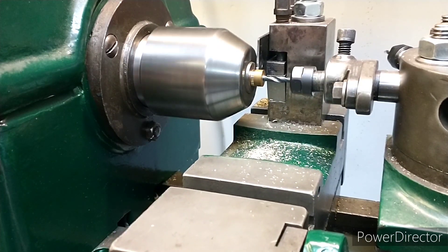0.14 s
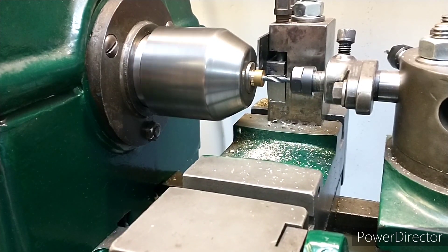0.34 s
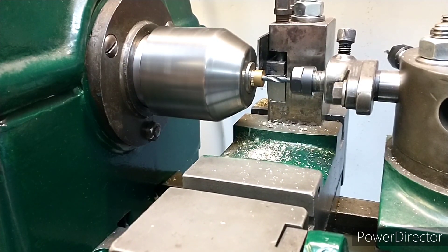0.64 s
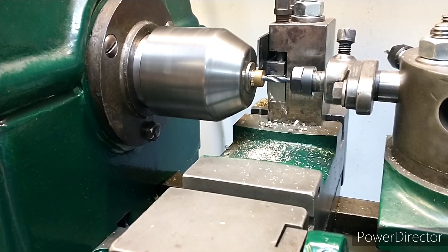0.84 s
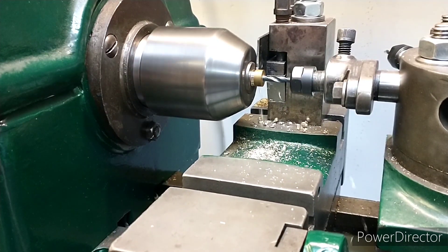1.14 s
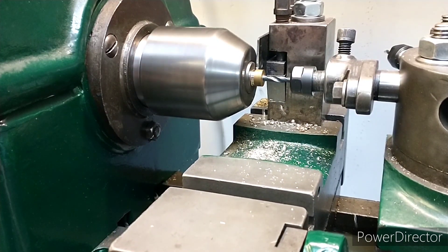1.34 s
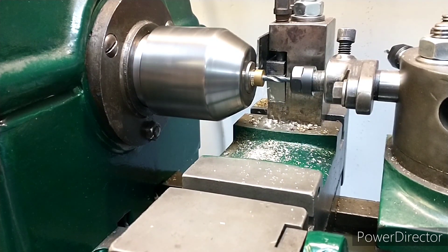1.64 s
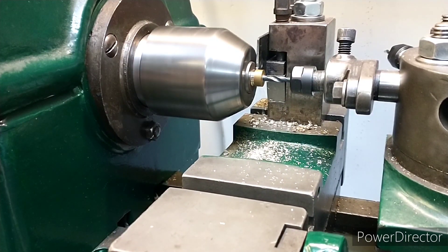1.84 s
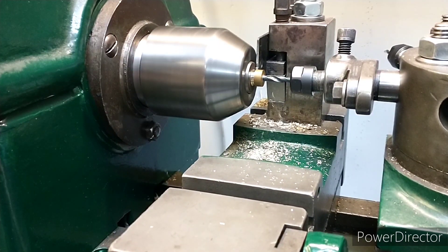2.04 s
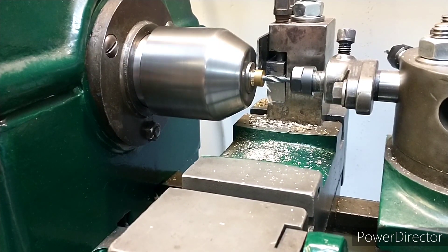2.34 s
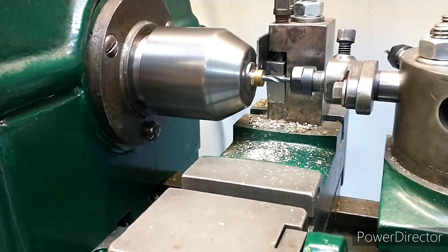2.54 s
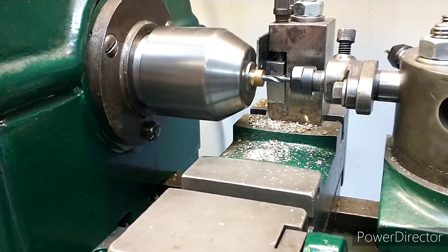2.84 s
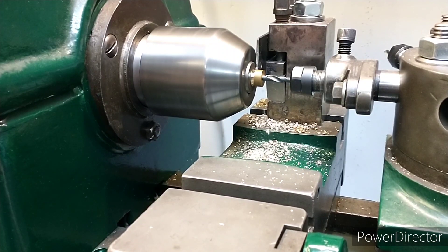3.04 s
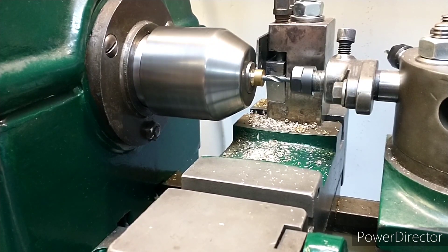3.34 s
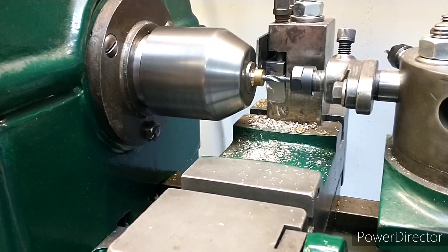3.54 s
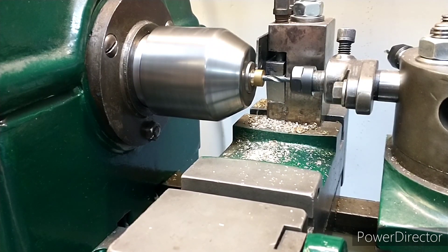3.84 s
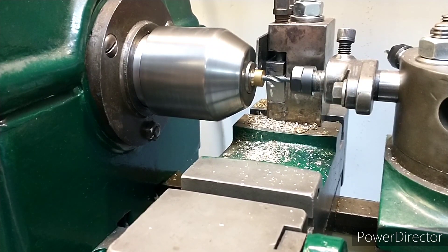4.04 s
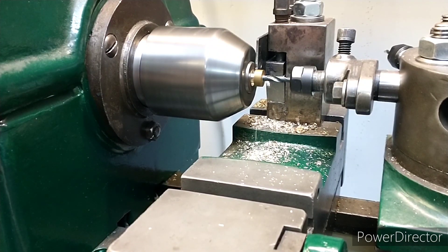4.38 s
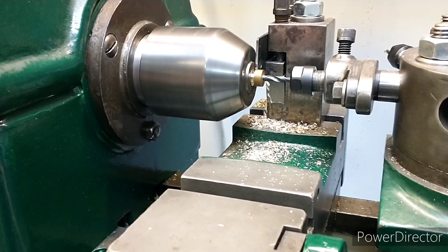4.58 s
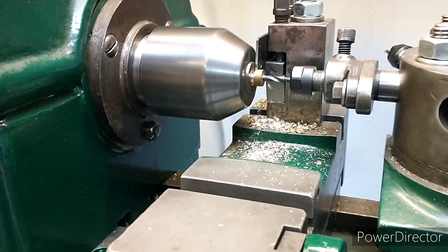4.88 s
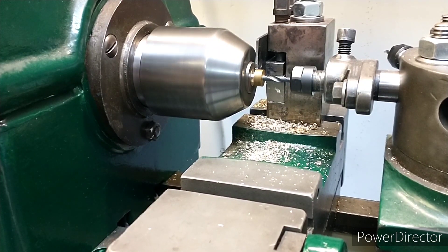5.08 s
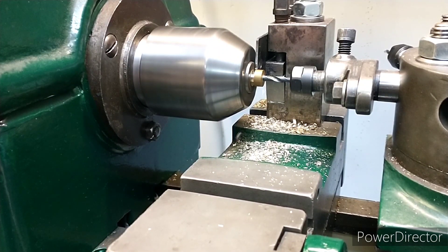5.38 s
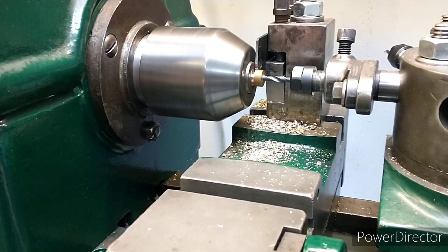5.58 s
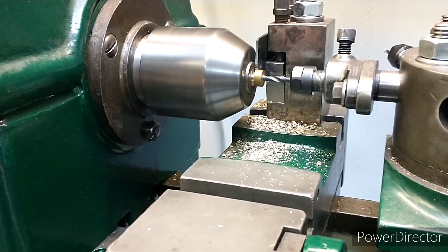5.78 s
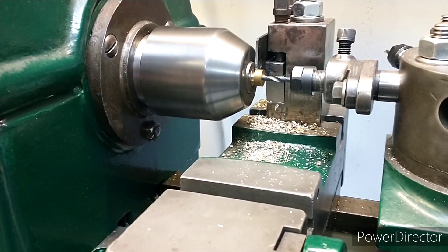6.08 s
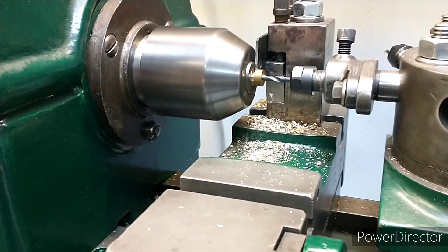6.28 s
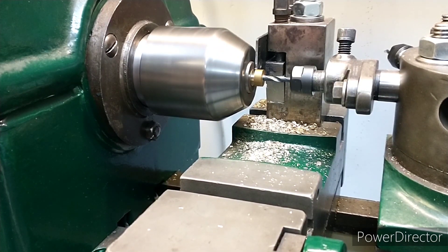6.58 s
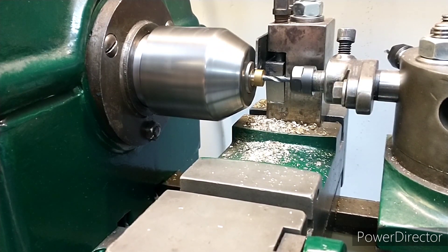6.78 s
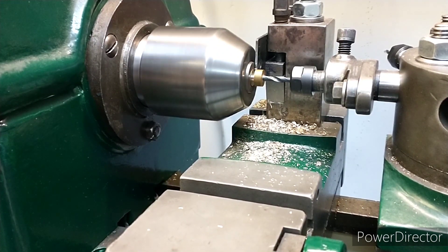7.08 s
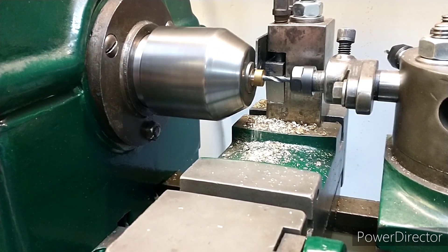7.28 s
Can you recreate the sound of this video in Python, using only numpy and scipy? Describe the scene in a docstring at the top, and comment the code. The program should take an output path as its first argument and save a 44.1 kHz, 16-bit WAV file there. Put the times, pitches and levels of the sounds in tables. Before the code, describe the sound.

A lathe tool cuts spinning brass with a pulsing metallic screech that sinks in pitch, over hissing chips and a steady motor hum.

```python
"""A lathe tool cutting spinning brass: it grazes the stock, digs in, then screeches in even pulses.
The chip shears off in thousands of slips a second; each bite thickens it, so the pitch dips and the
level swells. Crumbling chip hisses; tip and holder ring. Below, the motor hums, the drive ticks once
a turn and the slide knocks at the start. Machine faces and the workshop scatter the sound."""
import sys
import numpy as np
from scipy import signal
from scipy.fft import rfft, irfft
from scipy.io import wavfile
from scipy.ndimage import uniform_filter1d

SR = 44100
rng = np.random.default_rng(int(sys.argv[2]) if len(sys.argv) > 2 else 0)


def store_pcm(level_fs):
    """Save levels as 16-bit WAV."""
    pcm = np.round(np.clip(level_fs, -1, 1) * 32767).astype(np.int16)
    wavfile.write(sys.argv[1], SR, np.atleast_2d(pcm).T)


N = 327222
TIME = np.arange(N) / SR
FREQ = np.maximum(np.arange(N // 2 + 1) * SR / N, 1)

# how well the machine radiates the cut: f/Hz, gain/dB
RADIATION = [(100, -40), (600, -16), (1500, -9), (2000, -0.5), (2280, -3.5), (2450, -0.5), (3050, -4),
             (3330, -9.5), (3900, -5.5), (5000, -2.5), (6000, 2), (7000, -2), (9000, 3.5), (12300, -1.5),
             (13600, -5.5), (15000, -11.5)]


def amp(db):
    """dB to gain."""
    return 10 ** (np.asarray(db) / 20)


def unit(x):
    """Scale to rms 1."""
    return x / np.sqrt(np.mean(x ** 2))


def pan(db):
    """Stereo gains for a left-minus-right level."""
    return amp(np.array([[db], [-db]]) / 2)


def colour(x, points):
    """Filter by (f/Hz, gain/dB) points."""
    hz, db = np.transpose(points)
    return irfft(rfft(x) * amp(np.interp(np.log(FREQ), np.log(hz), db)), N)


def tint(x, points):
    """Colour, then scale to rms 1."""
    return unit(colour(x, points))


def walk(rate_hz):
    """Smooth random wander, rms 1."""
    return unit(irfft(rfft(rng.standard_normal(N)) / (1 + (FREQ / rate_hz) ** 4), N))


def swell(at_s, length_s):
    """Rounded force pulse, peak 1."""
    away = np.minimum(np.abs(2 * (TIME - at_s) / length_s), 10)
    return np.exp(-away * away * away / 2)


def blow(age_s, decay_s):
    """Sudden push that dies away, peak 1."""
    age = np.maximum(age_s, 0) / decay_s
    return np.sqrt(2 * np.e * age) * np.exp(-age)


def resonate(x, modes):
    """Ring (f/Hz, width/Hz, gain/dB) resonances."""
    response = sum(amp(db) / (1 + 2j * (FREQ - hz) / width) for hz, width, db in modes)
    return irfft(rfft(x) * response, N)


def follow(x, hz, low, high, leak_db, size=256):
    """Constant-power moving band, low * hz to high * hz: steep below, gentle above."""
    f, t, frames = signal.stft(x, SR, nperseg=size)
    ratio = f[:, None] / np.interp(t, TIME, hz)
    highpass = 1 / np.hypot(1, (low / (ratio + 1e-3)) ** 8) + amp(leak_db)
    gain = highpass / np.hypot(1, (ratio / high) ** 2)
    gain /= np.sqrt(np.mean(gain ** 2, axis=0))
    return signal.istft(frames * gain, SR, nperseg=size)[1][:N]


def scatter(x, t60_s, size):
    """Dense decaying reflections, different at each ear."""
    tail = rng.standard_normal((2, size)) * np.exp(-np.log(1000) * TIME[:size] / t60_s)
    tail /= np.sqrt(np.sum(tail ** 2, axis=1, keepdims=True))
    return signal.fftconvolve(x[None], tail, axes=1)[:, :N]


def smear(x, spread_s, bands=200):
    """Machine reflections delay each band by its own time; left paths are longer."""
    knots_hz = np.linspace(0, SR / 2, bands)
    paths_s = rng.exponential(spread_s, (2, bands)) * np.array([[2], [1]])
    delay_s = np.array([np.interp(FREQ, knots_hz, row) for row in paths_s])
    return irfft(rfft(x) * np.exp(-2j * np.pi * np.cumsum(delay_s, axis=1) * SR / N), N)


def motor(rumble_db=-46.5, waver_db=-0.1):
    """Mains hum in the castings over bearing and belt rumble."""
    # motor and drive lines: f/Hz, level/dB, left minus right/dB, left lead/rad
    hum_lines = [(100.27, -41, .3, 0), (176, -58, 1, 0), (200.55, -52.5, 1, 0), (225, -62, 1, 0),
                 (300.82, -45.5, 3, .55), (401.1, -52.5, 3, .5)]
    # bearings and belt: f/Hz, level/dB
    spectrum = [(20, -14), (55, -15), (80, -2.5), (135, -5), (180, -3), (265, 2), (330, -2.5), (430, -3.5),
                (500, -7.5), (800, -7), (1800, -13), (3000, -16), (4200, -26.5), (15000, -20.5)]
    hum = 0
    for hz, db, side_db, lead in hum_lines:
        phase = 2 * np.pi * hz * TIME + rng.uniform(0, 2 * np.pi) + 0.1 * walk(2.2)
        peak = np.sqrt(2) * amp(db + waver_db * walk(7.2))
        hum = hum + peak * pan(side_db) * np.sin(phase + np.array([[lead], [0]]))
    mid = tint(rng.standard_normal(N), spectrum)
    side = tint(rng.standard_normal(N), spectrum)
    side = colour(side, [(100, -7.5), (350, -6.0), (600, -7.5), (1000, 1.0)])
    return hum + amp(rumble_db) * (mid + side * np.array([[1], [-1]])) * pan(0.41)


def drive(spindle_hz=14.988, first_s=0.0494, decay_s=0.0054, gain_db=-48, after_s=0.011, after_db=-6):
    """One tick per spindle turn, a weaker one just after."""
    def tick(at_s):
        return blow((TIME - at_s) % (1 / spindle_hz), decay_s)
    ticks = tick(first_s) + amp(after_db) * tick(first_s + after_s)
    force = uniform_filter1d(ticks, size=130) * amp(walk(8.2))
    # drive tick: f/Hz, level/dB
    spectrum = [(300, -39), (600, 0.5), (900, -2), (1200, 8), (1450, -4), (1750, 12.5), (2150, 0),
                (2900, 3.5), (3600, -49), (8000, -34)]
    return tint(rng.standard_normal(N), spectrum) * force * amp(gain_db)


def slide(decay_s=0.0058, rattle_db=3.0):
    """The slide rattles briefly as it is fed up to the work."""
    # slide knocks: t/s, level/dB
    knocks = [(0.019, -41.5), (.086, -38), (.154, -41), (.22, -39.5), (0.285, -35.5)]
    # one knock: f/Hz, level/dB
    spectrum = [(200, -18), (450, -8), (620, 12), (850, 2), (1080, 9.5), (1350, -3.5), (1750, -1),
                (2200, -5), (3000, -4.5), (5000, -24)]
    force = sum(amp(db) * blow(TIME - at_s, decay_s) for at_s, db in knocks)
    rattle = rng.standard_normal(N) * amp(rattle_db * walk(320))
    return tint(rattle, spectrum) * force


def grazes(first_s=0.066, every_s=0.0708, length_s=0.016, first_db=-49.5, step_db=7.5, top_db=-22.5):
    """The tip brushes the stock's high spot about once a turn, then rubs lightly all round."""
    # tip rubbing on brass: f/Hz, level/dB
    spectrum = [(500, -9), (3000, -27), (5500, -17), (7000, -4), (9000, 4.5), (11500, 4), (13600, -10),
                (15500, -3.5)]
    turns = np.arange(7)
    levels_db = np.minimum(first_db + step_db * turns, top_db)
    brushes = sum(amp(db) * swell(s, length_s) for s, db in zip(first_s + every_s * turns, levels_db))
    rubbing = amp(-43) * np.interp(TIME, [0, .2, .45, .9, 1.2], [0.83, 0.0, 1.0, 0.52, 0.053])
    return tint(rng.standard_normal(N), spectrum) * (brushes + rubbing)


def tip(rub):
    """Rubbing keeps the tool tip ringing thinly."""
    # tip resonances: f/Hz, width/Hz, gain/dB
    modes = [(11335, 90, 2), (11540, 50, -2)]
    return resonate(rub, modes) * amp(-1) * pan(2.5)


def shudder(force, slip_hz, gain_db=-25):
    """The heaviest chips shake the tool holder."""
    # holder shake: f/Hz, level/dB
    spectrum = [(300, -45), (600, -15), (780, -2), (1000, -4), (1200, -3.5), (1600, -15), (3000, -12.5)]
    return tint(rng.standard_normal(N), spectrum) * force * (2500 / slip_hz) ** 2 * amp(gain_db)


def holder(force, slip_hz, gain_db=-20, thick_hz=4200):
    """Thick chips jolt the holder, which rings hollowly."""
    # holder resonances: f/Hz, width/Hz, gain/dB
    modes = [(2550, 130, 1.5), (2953, 52, 1), (4205, 66, -3)]
    jolts = rng.standard_normal(N) * amp(1.9 * walk(300))
    weight = np.minimum(thick_hz / slip_hz, 1) ** 4
    return unit(resonate(jolts, modes)) * force * weight * amp(gain_db)


def ring(x):
    """Metal resonances radiate unevenly to each side; rms gain 1."""
    # tool, holder and chuck: f/Hz, width/Hz, left/dB, right/dB
    modes = [(2460, 97, 7, 10), (2976, 87, 11, 14.5), (3280, 44, 0, 6), (3500, 127, 10.5, 12.5),
             (3693, 140, 11.5, 12), (4119, 170, 14.5, 16), (4460, 155, 6.5, 5), (4660, 65, 15, 10),
             (4907, 107, 9, 4.5), (5260, 130, 9, 6.5), (5780, 260, 1.5, 0), (6280, 67, 4.5, -3),
             (6680, 130, 15.5, 15), (7000, 91, -6.5, 12), (7278, 210, 17, 1.5), (7670, 308, 0, 8.5),
             (8604, 78, 9.5, 9), (8900, 304, 9, 0), (9870, 410, 2.5, 2.5), (11030, 118, 7.5, 7),
             (11320, 152, 12.5, 11.5), (11430, 140, 11.5, 1), (12600, 106, 7, 1), (13030, 520, 9.5, 6),
             (14376, 546, 9.5, 13), (14860, 273, 12.5, 13.5)]
    gain = amp(sum(np.array([[left], [right]]) / (1 + (2 * (FREQ - hz) / width) ** 2)
                   for hz, width, left, right in modes))
    return irfft(rfft(x) * gain / np.sqrt(np.mean(gain ** 2)), N)


def feed_db(t, entry_db_per_s=78):
    """Base level of the cut: rises as the edge enters, then follows feed pressure."""
    # thin cut under the feed: t/s, level/dB
    pressure = [(0.85, -41), (0.97, -26), (1.5, -24), (2.2, -20), (2.65, -22), (3.1, -21), (3.95, -20.5),
                (4.35, -24), (4.7, -22.5), (5.45, -27.5), (6.1, -26), (7.42, -32)]
    at_s, db = np.transpose(pressure)
    return np.interp(t, at_s, db) - entry_db_per_s * np.maximum(at_s[0] - t, 0)


def chip(fall_width=0.51, rise_width=0.69, bite_db=-3.0, thin_db=-10, usual_db=7.5, lead_s=.008):
    """Cutting force, slip rate, bite depth (0-1). Bites thicken the chip and slow its slips."""
    # short heavy chips: t/s, strength/dB, length/s, lowest slip rate/Hz
    bites = [(1.012, 4, .05, 8800), (1.097, 7, .05, 8240), (1.185, 8, 0.051, 7790),
             (1.277, 8.5, 0.052, 7060), (1.37, 11.5, 0.064, 5596), (1.474, 10.5, 0.052, 6140),
             (1.604, 7, 0.07, 5800), (1.723, 6.5, .059, 6000), (1.83, 8.5, 0.061, 5320),
             (1.959, 8.5, 0.062, 5110), (2.069, 8, 0.062, 4712), (2.174, 7, 0.065, 4676),
             (2.293, 8.5, .064, 4486), (2.423, 6.5, 0.067, 4110), (2.562, 7.5, .072, 4420),
             (2.701, 8, 0.074, 4266), (2.816, 6, 0.053, 5300), (2.913, 6, 0.065, 5035),
             (3.016, 1.5, 0.054, 5420), (3.1, 1, 0.074, 5784), (3.169, -2, .045, 6730),
             (3.24, 2, 0.065, 5103), (3.374, 4.5, 0.066, 3896), (3.495, 7.5, 0.063, 3750),
             (3.624, 7.5, .068, 3734), (3.688, -3, .035, 5393), (3.757, 6, .072, 3750),
             (3.9, 5, 0.071, 4000), (3.971, 3.5, 0.046, 5250), (4.041, 5.5, 0.064, 4283),
             (4.159, 6, .06, 3758), (4.296, 8, 0.06, 3960), (4.434, 6, 0.061, 4228),
             (4.561, 5.5, .06, 3652), (4.671, 3.5, 0.048, 4113), (4.761, 2, 0.052, 4094),
             (4.878, 5.5, .062, 3350), (5.019, 7.5, 0.069, 3050), (5.16, 10, 0.071, 2607),
             (5.297, 4, 0.061, 4006), (5.43, 6, 0.059, 3300), (5.575, 7, 0.061, 3100),
             (5.685, 10, 0.063, 2890), (5.83, 10.5, 0.067, 2400), (5.977, 7.5, 0.063, 2660),
             (6.097, 9, 0.065, 2298), (6.224, 7, .07, 2340), (6.381, 6.5, 0.065, 2512),
             (6.538, 8, .07, 2330), (6.685, 7, .066, 2400), (6.814, 6.5, 0.09, 2400),
             (6.984, 8, 0.07, 2227), (7.103, 8, 0.061, 2202), (7.226, 8, .07, 2203),
             (7.387, 8.5, 0.093, 1837)]
    # jolts where the edge catches: t/s, level over feed/dB
    snags = [(1.458, 2), (2.408, 3.5), (2.669, 6), (3.35, 5), (4.681, 2.5), (5.183, 8.5), (6.228, 6.5)]
    # thin-chip slip rate, sinking as the tool goes deeper: t/s, f/Hz
    thin_slip = [(1.0, 10610), (2.1, 8983), (2.7, 8470), (3.1, 6990), (3.4, 8220), (3.7, 6555), (4.0, 5700),
                 (4.25, 6796), (4.72, 5317), (5.0, 6560), (5.6, 5970), (6.0, 4870), (7.42, 3694)]
    at_s, strength_db, lengths_s, lowest_hz = np.transpose(bites)
    peaks_db = feed_db(at_s) + strength_db + bite_db
    bite_force = sum(amp(db) * swell(s, length) for s, length, db in zip(at_s, lengths_s, peaks_db))
    snag_force = sum(amp(feed_db(s) + db) * blow(TIME - s, decay_s=0.0044) for s, db in snags)
    # the chip squeals on between light bites; hard ones break it off
    break_db = 0.73 * np.interp(TIME, at_s, strength_db - usual_db)
    thin_force = amp(feed_db(TIME) + thin_db - break_db)
    force = np.sqrt(bite_force ** 2 + snag_force ** 2 + thin_force ** 2)

    thin_period_s = 1 / np.interp(TIME, *np.transpose(thin_slip))
    period_s, depth = thin_period_s.copy(), np.zeros(N)
    for s, length, hz in zip(at_s, lengths_s, lowest_hz):
        near = slice(*np.searchsorted(TIME, [s - 2 * length, s + 2 * length]))
        age_s = TIME[near] - s + lead_s  # pitch bottoms out just before the force peaks
        width_s = np.where(age_s < 0, fall_width, rise_width) * length
        thickness = np.exp(-np.abs(age_s / width_s) ** 2.5)
        slowed_s = thin_period_s[near] + (1 / hz - thin_period_s[near]) * thickness
        period_s[near] = np.maximum(period_s[near], slowed_s)
        depth[near] = np.maximum(depth[near], thickness)
    return force, 1 / period_s, depth


def scrape(force, slip_hz, thin_db=-4, bite_db=-3.5, grit_db=2.5, flutter_db=1.5):
    """Crumbling chip hisses over the tool face from about the slip rate up; brighter in bites."""
    fine = rng.standard_normal(N) * amp(grit_db * walk(1400) + flutter_db * walk(35))
    steady = tint(follow(fine, slip_hz, low=0.79, high=1.36, leak_db=-14), RADIATION)
    coarse = rng.standard_normal(N) * amp(grit_db * walk(550))
    bright = tint(follow(coarse, slip_hz, low=0.92, high=4.3, leak_db=-21.5), RADIATION)
    return steady * amp(feed_db(TIME) + thin_db) + bright * amp(bite_db) * force


def whistle(force, slip_hz, depth, gain_db=-3.0, thin_hz=5600, chatter_db=2.0):
    """In a bite the slips fall into step and whistle; uneven tearing roughens each partial."""
    # chip whistle: multiple of slip rate, level/dB
    partials = [(1, 0), (2, -4), (3, -12)]
    pitch_hz = slip_hz * np.exp(.014 * walk(160))
    phasor = np.exp(2j * np.pi * np.cumsum(pitch_hz) / SR)
    tone = 0
    for k, db in partials:
        tearing = 1 + .45 * (walk(260) + 1j * walk(260))
        tone = tone + amp(db) * np.real(tearing * phasor ** k)
    held = depth ** .3 / np.hypot(1, (slip_hz / thin_hz) ** 6)  # a thin chip hardly holds a note
    return unit(tone * amp(chatter_db * walk(140))) * force * held * amp(gain_db)


def slips(hz, jitter, oversample=4):
    """One click per shear of the chip, each with its own timing."""
    drift = np.cumsum(jitter * np.sqrt(hz / SR) * rng.standard_normal(N))
    cycles = np.maximum.accumulate(np.cumsum(hz / SR) + uniform_filter1d(drift, size=5))
    at_samples = np.interp(np.arange(1, int(cycles[-1])), cycles, np.arange(N))
    impulses = np.bincount(np.round(at_samples * oversample).astype(int), minlength=N * oversample)
    clicks = signal.resample_poly(impulses * 1., 1, oversample) * oversample
    return (clicks - hz / SR) / np.sqrt(hz)  # no DC, power independent of rate


def screech(force, slip_hz, flake_hz=260, flake_db=3.5, gain_db=-2.0, rolloff_hz=7500):
    """The slips squeal, most evenly at middling chip thickness; breaking flakes add roughness."""
    uneven = np.maximum(slip_hz / 4600, 1) * np.maximum(3600 / slip_hz, 1)
    clicks = slips(slip_hz * np.exp(.038 * walk(250)), jitter=.056 * uneven)
    tone = tint(follow(clicks, slip_hz, low=0.7, high=1.8, leak_db=-3), RADIATION)
    flakes = unit(amp(flake_db * walk(flake_hz)))
    return tone * flakes * force * amp(gain_db) / np.hypot(1, (slip_hz / rolloff_hz) ** 3)


def scene():
    """Squeal, hiss and drive reflect off the machine and the room, over the motor."""
    force, slip_hz, depth = chip()
    fade = np.minimum((TIME[-1] - TIME) / .015, 1)
    squeal = (screech(force, slip_hz) + whistle(force, slip_hz, depth) + holder(force, slip_hz)) * fade
    rub = (scrape(force, slip_hz) + grazes()) * fade
    tool = squeal + rub
    machine = drive() + slide() + shudder(force, slip_hz)
    near_tool = smear(squeal, spread_s=.0009) + smear(rub, spread_s=.0009)
    near_machine = smear(machine, spread_s=.0005)
    faces = amp(-8) * scatter(tool, t60_s=.07, size=4096)
    room = amp(-9) * scatter(tool, t60_s=0.55, size=16384)
    cutting = ring(near_tool + faces + room) * pan(1.0) * amp(-0.5)
    body = amp(6.5) * near_machine + amp(5.0) * scatter(machine, t60_s=0.16, size=16384)
    return cutting + tip(rub) + body + motor()


def record(dry, top_hz=15400):
    """The microphone cuts the top treble."""
    return signal.sosfilt(signal.ellip(10, .2, 80, top_hz, fs=SR, output="sos"), dry)


dry = scene()
out = record(dry)
store_pcm(out)
```